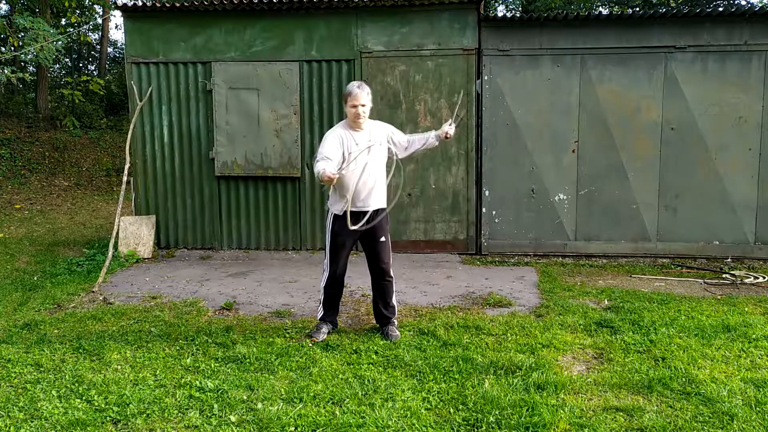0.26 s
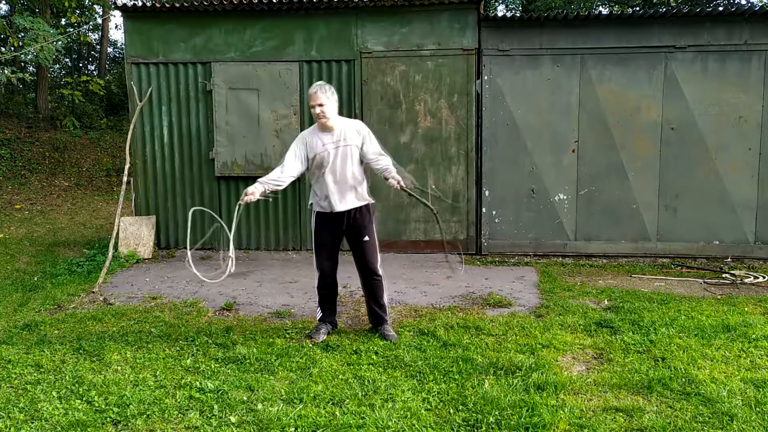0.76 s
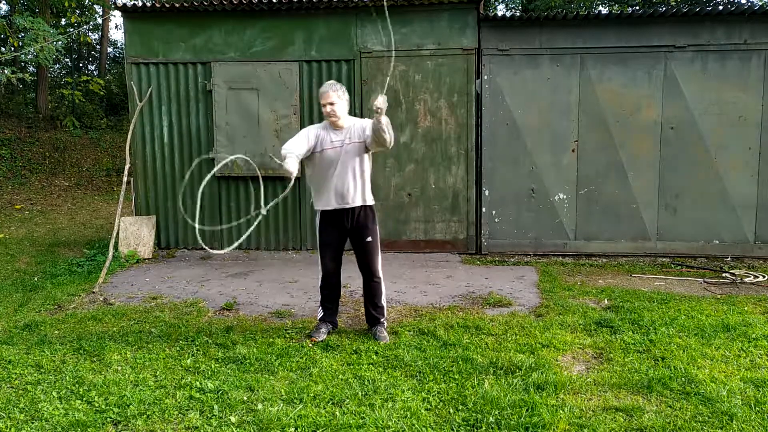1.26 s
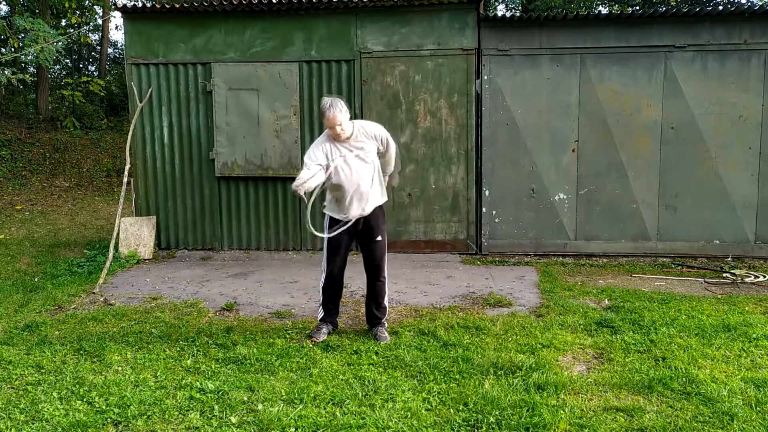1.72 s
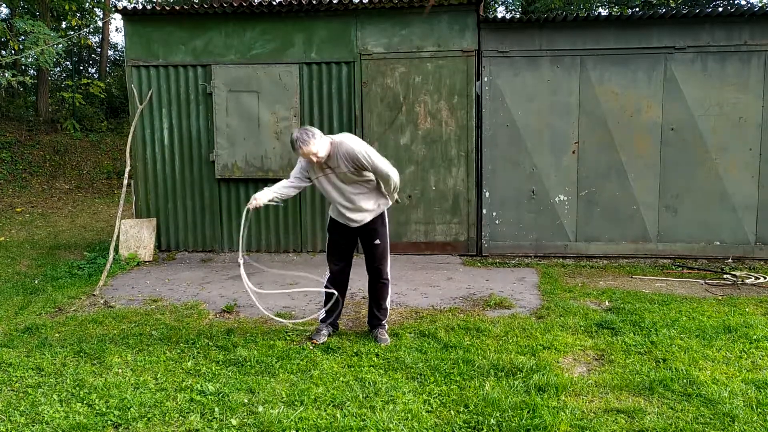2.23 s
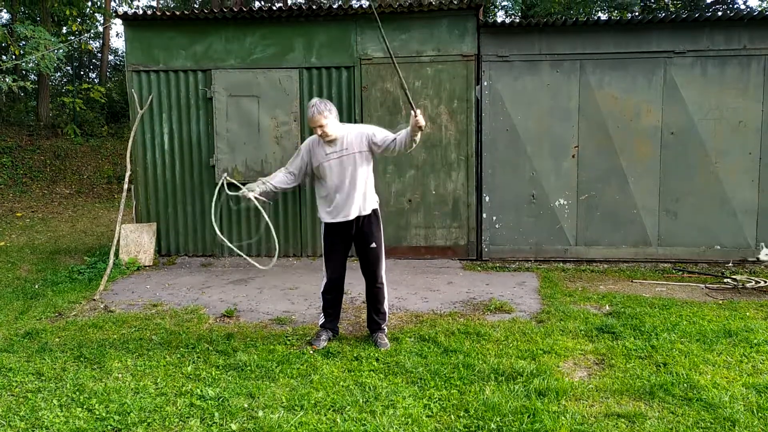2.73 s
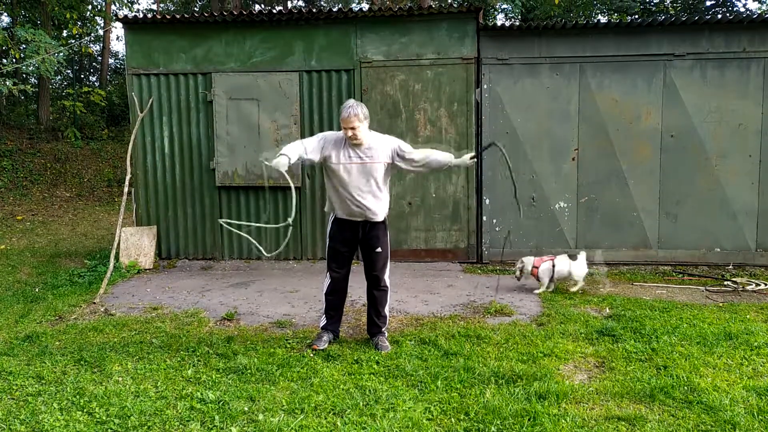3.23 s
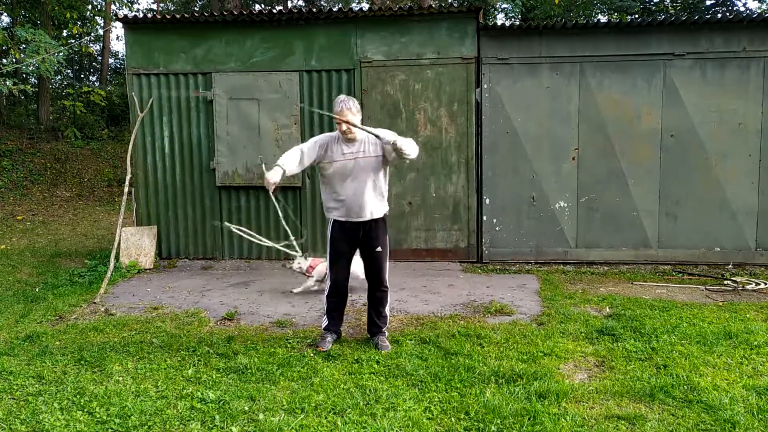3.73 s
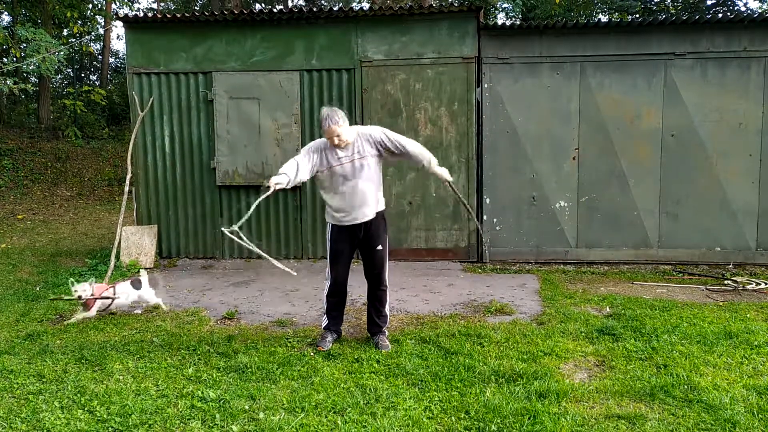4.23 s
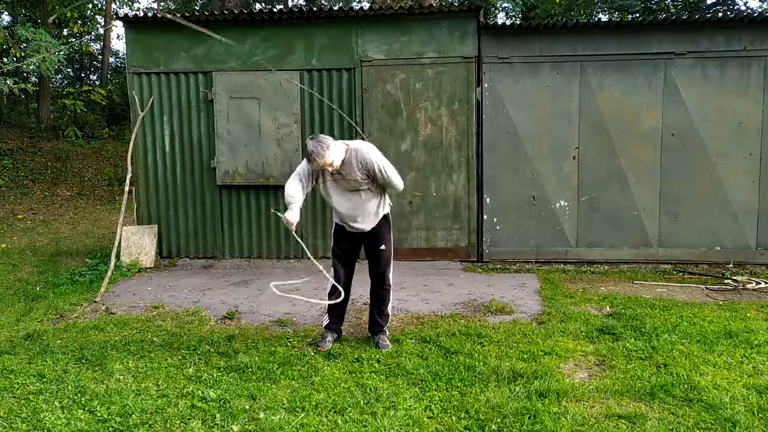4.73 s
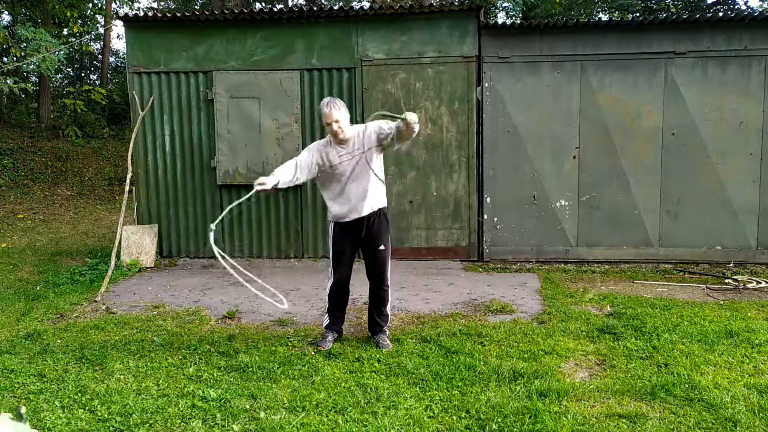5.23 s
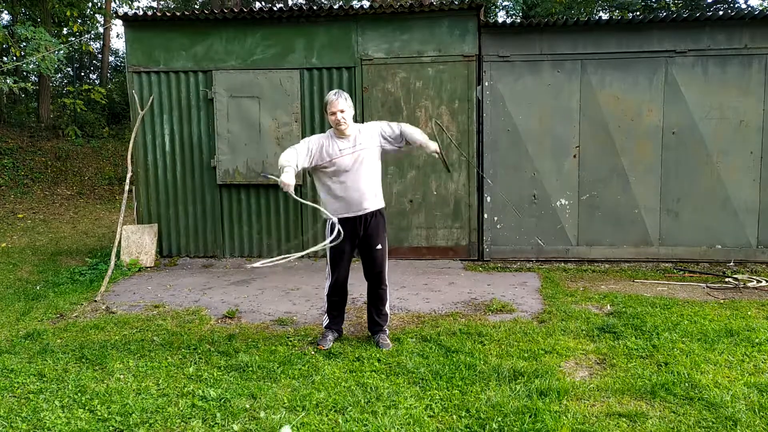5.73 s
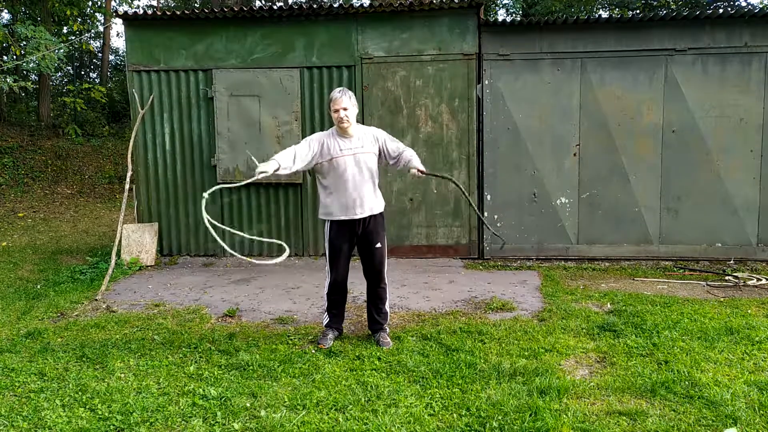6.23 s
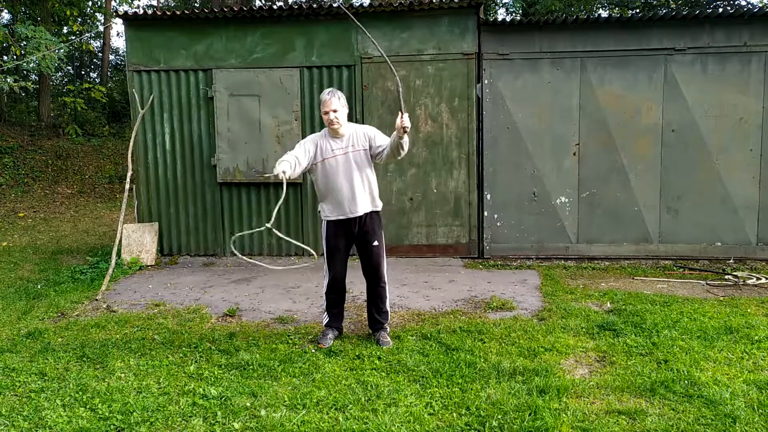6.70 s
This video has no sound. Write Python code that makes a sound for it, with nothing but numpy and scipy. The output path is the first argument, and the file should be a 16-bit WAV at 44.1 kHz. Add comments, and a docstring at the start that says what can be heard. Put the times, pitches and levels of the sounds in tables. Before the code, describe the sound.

A whip crack opens abruptly, then eight more follow at uneven gaps of roughly a third of a second to a second and a half. Each is a dry, explosive snap with a bright, quickly dying echo from a metal shed and a thinner tail from trees. Between them come breathy lash swishes, sleeve rustle, small ticks and soft rope thuds. Quiet outdoor air; the stereo microphone overloads slightly on the hardest cracks.

```python
"""A whip crack opens the scene and eight more follow, on a lawn in front of a sheet-metal shed.
Each is an N-shaped shock inside a noise burst; filtered, decaying noise gives the echoes of shed and trees.
The lash whistles in gliding bands of noise, and short noise blows are its patter and the rope's thuds.
Behind lie quiet air, rustling sleeves, a fizz near 10 kHz as of insects in the grass, and one faint far tone.
The hardest shocks choke the microphone: the level dips briefly and a low thump is added."""
import sys
import numpy as np
from scipy import signal
from scipy.fft import rfft, irfft
from scipy.io import wavfile
from scipy.ndimage import uniform_filter1d

SR = 44100
rng = np.random.default_rng(int(sys.argv[2]) if len(sys.argv) > 2 else 0)


def master_out(mix):
    """Clip the mix to full scale and print it as 16-bit PCM to the path in sys.argv[1]."""
    frames = np.transpose(np.atleast_2d(mix))
    ceiling = np.clip(frames, -1, 1)
    pcm = np.round(ceiling * 32767).astype(np.int16)
    wavfile.write(sys.argv[1], SR, pcm)


N = 306926

# the throws: t/s, left shock/dB, right shock/dB, burst length/s, early snap/dB, yard echo setting/dB,
#   far echo setting/dB, null of the shock's spectrum f/Hz, echo tilt at 12 kHz/dB, wind-up setting/dB,
#   wind-up length/s
CRACKS = [(0.0, 57, 57.5, 0.0011, -62, -11.5, -28, 6300, -3.5, -59, .05),
          (1.5426, 19, 46.5, 0.006954, -53, -10.5, -33, 7365, -0.5, -59, 0.06),
          (2.443, -9.5, 13.5, 0.005864, -14.5, -14, -30.5, 13000, 2, -42, 0.042),
          (3.171, 26, 23, 0.00266, -53, -14.5, -33, 8121, 0.5, -61.5, 0.07215),
          (3.4277, -13, 29, 0.004, -52.5, -17, -29.5, 10400, 1, -64, 0.062),
          (4.2812, 18.5, 43, 0.004803, -43, -11, -29.5, 6998, -1.5, -55.5, 0.1),
          (5.07, -10.5, 3, .0045, -3, -11.5, -28, 13300, 1, -48.5, .075),
          (5.8427, 26, 42, .0018, -60, -13, -31, 7865, 2.5, -60.5, 0.03977),
          (6.1409, -17, 29, 0.0048, -53, -19.5, -27, 12000, 6, -53, 0.034)]
# left-right likeness of sound straight from the whip: f/Hz, likeness/1
NEAR_SAME = [(300, 1), (2000, 0), (10000, 0)]
# left-right likeness of diffuse sound such as the echoes: f/Hz, likeness/1
ECHO_SAME = [(200, 0.96), (700, .4), (2000, 0), (8000, 0)]


def amp(db):
    """Level definition: the amplitude ratio of a level in dB."""
    return 10 ** (np.asarray(db) / 20)


def evened(x):
    """Normalization: scales a signal to rms 1."""
    return x / np.sqrt(np.mean(x ** 2) + 1e-20)


def read(points, hz):
    """Interpolation: joins a table's points by straight lines in log frequency."""
    f, value = np.transpose(points)
    return np.interp(np.log(hz + 1), np.log(f + 1), value)


def add(mix, s, sound):
    """Superposition: adds a stereo sound at time s; what falls outside the mix is dropped."""
    start = round(s * SR)
    sound = sound[:, max(-start, 0):]
    part = mix[:, max(start, 0):][:, :sound.shape[1]]
    part += sound[:, :part.shape[1]]


def noise(size, shape_db, same):
    """Partial coherence: stereo noise of rms 1, spectrum shape_db(hz), left-right likeness table same."""
    hz = np.fft.rfftfreq(size, 1 / SR)
    left, other = rfft(rng.standard_normal((2, size)))
    likeness = np.clip(read(same, hz), -1, 1)
    right = likeness * left + np.sqrt(1 - likeness ** 2) * other
    return evened(irfft(np.array([left, right]) * amp(shape_db(hz)), size))


def hump(centre_hz, octaves):
    """Band-pass response in dB: a rounded band with gentle skirts in log frequency."""
    def shape_db(hz):
        distance = np.log2((hz + 1) / centre_hz) / octaves
        return -40 * np.log10(1 + distance ** 2 / 2)
    return shape_db


def flutter(size, seconds):
    """Low-pass random modulation: chance of rms 1 that changes over about the given time."""
    hz = np.fft.rfftfreq(size, 1 / SR)
    lowpass = np.exp(-(hz * seconds) ** 2) * (hz > 0)
    return evened(irfft(rfft(rng.standard_normal(size)) * lowpass, size))


def swells(t, bouts, rest_db):
    """Amplitude summation: level in dB of bell-shaped swells (s, length s, dB) over a resting level."""
    bells = sum(amp(db) * np.exp(-((t - s) / length) ** 2) for s, length, db in bouts)
    return 20 * np.log10(amp(rest_db) + bells)


def background(rustle_db=-3):
    """Broadband ambience: quiet air, the rustle of sleeves and rope, and a high fizz from the grass."""
    # still outdoor air: f/Hz, density/dB; its left-right likeness: f/Hz, likeness/1
    air_shape = [(20, -35), (35, -12), (55, 0.14), (90, -2), (150, -8), (300, -8), (600, -14), (1500, -20),
                 (4000, -21), (16000, -24)]
    air_same = [(60, 0.83), (240, 0.9756), (950, 0.1783), (4000, 0)]
    # sleeves and rope swish twice with every throw: t after the crack/s, length/s, relative level/dB
    throw = [(-.01, .09, -59.5), (0.273, .13, -67)]
    # spectrum of the fizz: f/Hz, density/dB; its bouts: t at its height/s, length/s, level/dB
    fizz_shape = [(2000, -43), (6000, -16.5), (8300, -9), (9800, 1.5), (12000, -11), (16000, -10.5)]
    fizz_bouts = [(1.15, 0.71, -65), (3.125, 0.042, -50), (3.8, 0.74, -64.5), (6.5, 0.73, -57)]

    t = np.arange(N) / SR
    arms = [(row[0] + after, length, db) for row in CRACKS for after, length, db in throw]
    air = amp(-60) * noise(N, lambda hz: read(air_shape, hz), air_same)
    rustle_level = swells(t, arms, rest_db=-76) + rustle_db + 1.9 * flutter(N, 0.042)
    rustle = amp(rustle_level) * noise(N, hump(340, 0.24), NEAR_SAME)
    fizz_level = swells(t, fizz_bouts, rest_db=-78.5) + 1.8 * flutter(N, .02)
    fizz = amp(fizz_level) * noise(N, lambda hz: read(fizz_shape, hz), ECHO_SAME)
    return air + rustle + fizz


def far_tone():
    """Line spectrum: a faint tone of two sines with wandering phase sounds once, far off."""
    # lines of the tone: f/Hz, level/dB
    tone_lines = [(620, -70), (930, -68)]
    middle_s, length_s = 2.17, 0.2854
    t = np.arange(N) / SR
    lines = sum(amp(db) * np.sin(2 * np.pi * hz * t + 0.553 * flutter(N, 0.01532)) for hz, db in tone_lines)
    flat_topped_bell = np.exp(-(2 * (t - middle_s) / length_s) ** 4)
    return lines * flat_topped_bell


def tap(s, level_db, centre_hz, octaves, decay, scatter_db=-27, scatter_s=0.046):
    """Heavily damped impact: a dead blow without ring, and its faint scatter from the yard."""
    t = np.arange(SR // 5) / SR
    blow = (1 - np.exp(-8 * t / decay)) * np.exp(-t / decay)
    envelope = blow + amp(scatter_db) * np.exp(-t / scatter_s)
    return s, amp(level_db + 5) * envelope * noise(len(t), hump(centre_hz, octaves), NEAR_SAME)


def swish(s, length, level_db, pitch_hz, glide, thin_db, width_hz=210, thin_ratio=2.3, hiss_db=-2, flutter_db=2):
    """Vortex shedding: the thong's breathy tone follows its speed; the thin end sings higher and hisses."""
    t = np.arange(-length, length, 1 / SR)
    phase = 2j * np.pi * np.cumsum(pitch_hz * 2 ** (glide * t)) / SR  # glide in octaves per s

    def tone(ratio):
        """Heterodyning: low-passed complex noise is shifted up to the gliding pitch."""
        smooth = signal.butter(2, ratio ** 2 * width_hz / 2, fs=SR, output="sos")
        complex_noise = rng.standard_normal((len(t), 2)) @ [1, 1j]
        return evened((signal.sosfilt(smooth, complex_noise) * np.exp(ratio * phase)).real)

    hiss = noise(len(t), hump(2.4 * pitch_hz, 1.8), NEAR_SAME)
    envelope = amp(level_db + flutter_db * flutter(len(t), 0.031)) * np.exp(-(2 * t / length) ** 2)
    thin_end = .5 * tone(thin_ratio) + amp(hiss_db) * hiss
    return s - length, envelope * (tone(1) + amp(thin_db) * thin_end)


def sweep(s, length, level_db, pitch_hz, glide):
    """Speed-dependent radiation: the shorter a swing of the lash, the more of the thin end and its hiss."""
    flick_s, flick_thin_db, db_per_doubling = 0.044, 12.5, -14.5  # slow sweeps are duller
    return swish(s, length, level_db, pitch_hz, glide, flick_thin_db + db_per_doubling * np.log2(length / flick_s))


def bounce(ripple_db=1.0):
    """Multipath interference: many short paths off the ground ripple the spectrum (dB at Hz)."""
    grid = np.arange(0, SR / 2, 40)
    smooth = uniform_filter1d(rng.standard_normal(len(grid)), size=4)
    ripple = evened(uniform_filter1d(smooth, size=3))
    return lambda hz: ripple_db * np.interp(hz, grid, ripple)


def dying(x, t60, patchy_db):
    """Reverberant decay: each band dies at its own speed; scattered paths make it patchy."""
    hz, t, z = signal.stft(x, SR, nperseg=256)
    across_bands = uniform_filter1d(rng.standard_normal(z.shape[1:]), size=7, axis=0)
    patches = evened(uniform_filter1d(across_bands, size=4, axis=1))
    z = z * amp(patchy_db * patches - 60 * t / read(t60, hz)[:, None])
    return signal.istft(z, SR, nperseg=256)[1][:, :x.shape[1]]


def echoes(yard_db, far_db, body_db, top_db, null_hz, null_db, shed_s=.031, shed_width=0.0097, shed_db=3,
           hold=0.044575, slap_s=0.026, slap_db=4, trees_s=0.32, trees_db=3):
    """Diffuse reflection: lawn and ribbed shed wall scatter the crack at once, trees later and longer."""
    # spectra of the near and far echoes: f/Hz, density/dB
    yard_shape = [(25, -47.5), (100, -20.5), (250, -16.5), (600, -20), (1400, -17.5), (2100, -5),
                  (2800, -6.5), (3600, 0), (5000, 1.5), (7000, -0.5), (10000, -1.5), (12000, -6.5),
                  (16000, -10)]
    far_shape = [(25, -39), (100, -5.5), (400, -26.5), (1300, -14), (2300, -10), (4000, -1), (6000, -1.5),
                 (8000, -6.5), (11000, -2.5), (16000, -16)]
    # their ring times: f/Hz, t60/s
    yard_t60 = [(200, 0.17), (1000, 0.394), (2500, 0.36158), (5000, 0.3265), (10000, 0.31157),
                (16000, 0.21)]
    far_t60 = [(200, 1.4), (1000, 1.9822), (4000, 1.3002), (8000, 1.0107), (16000, 0.15)]

    t = np.arange(SR * 5 // 4) / SR
    tilt = [(700, 0.0035), (2000, body_db), (4500, 0.0071), (12000, top_db)]
    ripple = bounce(ripple_db=2.08)

    def colour(hz):
        """Destructive interference: the two edges of the N wave cancel at one frequency."""
        return read(tilt, hz) - null_db * np.exp(-((hz / null_hz - 1) / 0.2) ** 2)

    yard = noise(len(t), lambda hz: read(yard_shape, hz) + colour(hz) + ripple(hz), ECHO_SAME)
    yard = dying(yard, yard_t60, patchy_db=1.5)
    far = noise(len(t), lambda hz: read(far_shape, hz) + 0.15 * colour(hz), ECHO_SAME)
    far = dying(far, far_t60, patchy_db=2.0)
    # the wall answers with a short slap, its ribs with a swell
    slap = slap_db * np.exp(-((t - slap_s) / .001) ** 2)
    ribs = shed_db * np.exp(-((t - shed_s) / shed_width) ** 2)
    # paths keep arriving, so the level holds before it falls
    arriving = 9.0222 * np.minimum(t / hold, 1) - 0.5
    yard *= amp(yard_db + arriving + (slap + ribs))
    trees = trees_db * np.exp(-((t - trees_s) / 0.068) ** 2)
    far *= amp(far_db + trees) * (1 - np.exp(-t / 0.017))
    # single strong reflections stand out of the wash
    return (yard + far) * amp(1.5 * flutter(len(t), .001) + .8 * flutter(len(t), .012))


def burst(level_db, length, bass_db, lead=0.011, lead_db=-15, rise=0.0027, fall=0.0033):
    """Aerodynamic noise and scattering: the speeding tip tears the air; the ground scatters the shock."""
    # spectrum of the snap: f/Hz, density/dB
    snap_shape = [(20, -39.5), (80, 0), (160, -5), (260, -9.5), (400, -1), (550, -16.5), (900, -1),
                  (1400, -11.5), (3700, 1.5), (8000, 1), (12000, -6.5), (16000, -11)]
    t = np.arange(SR // 16) / SR - lead
    before = amp(lead_db) * np.exp(np.minimum(t, 0) / rise)
    after = np.exp(-np.maximum(t - length, 0) / fall)
    envelope = np.where(t < 0, before, after)
    shelf, ripple = [(900, bass_db), (2600, 0.014)], bounce()
    tear = noise(len(t), lambda hz: read(snap_shape, hz) + read(shelf, hz) + ripple(hz), NEAR_SAME)
    return lead, amp(level_db) * envelope * tear


def shock(left_db, right_db, size=12):
    """Sonic boom: the supersonic tip sends out an N-shaped wave about a quarter of a millisecond long."""
    return amp([[left_db], [right_db]]) * np.linspace(1, -1, size)


def crack(s, left_db, right_db, length, early_db, yard_db, far_db, null_hz, top_db, wind_up_db, wind_up_s):
    """Acceleration to supersonic speed: rising swish, early snap, burst, shock, echoes as (s, sound) parts."""
    hardness_db = right_db  # the right capsule mostly takes the shock more squarely
    bass_db = min(-11.5 + 0.63 * hardness_db, 9.5)  # a harder shock has more bass, up to a limit
    # a shorter wave has a higher null and less body at 2 kHz: -3 dB per octave
    body_db = 3 - 3 * np.log2(null_hz / 6512)
    # the harder the shock, the less of the crack is left in the burst
    lead, tear = burst(-2 - 0.0835 * hardness_db, length, bass_db)
    # the tip may snap once, 8 ms before the main crack
    early_s = .008
    _, early = burst(early_db, length=.0025, bass_db=-2)
    answer = echoes(yard_db, far_db, body_db, top_db, null_hz, null_db=5)
    # the wind-up peaks 0.31 of its length early, at 850 Hz, rising 1.15 octaves over that length
    wind_up = swish(s - 0.31 * wind_up_s, wind_up_s, wind_up_db, pitch_hz=850, glide=1.15 / wind_up_s, thin_db=1)
    return [wind_up, (s - lead - early_s, early), (s - lead, tear), (s, shock(left_db, right_db)), (s, answer)]


def scene():
    """Superposition: cracks, swings, ticks and thuds a little to the left, over air and one far tone."""
    # the lash swung round between cracks: t at its loudest/s, length/s, level setting/dB, pitch there f/Hz,
    #   glide/(octaves per s)
    swings = [(0.325, 0.059, -50, 848.8, 8.5), (0.601, 0.084, -54, 762.8, -5),
              (1.234, .12, -64.5, 796.1, -1), (1.826, 0.04427, -57.5, 1095, 8),
              (2.04, .07, -52.5, 932.5, -2), (2.679, 0.12, -54, 752, 0), (3.656, 0.043, -53.5, 723.5, 14),
              (4.027, 0.035, -67.5, 880, 0.5), (4.63, .12, -52, 800, 2), (4.887, 0.04, -68, 1204, 2),
              (5.318, .12, -53, 664, -1), (5.668, 0.053, -63, 903, 4.5), (5.758, 0.043, -58.5, 1001, -0.5)]
    # the lash pattering on the ground: t/s, level setting/dB, centre f/Hz, width/octaves, decay/s
    ticks = [(.7419, -27.5, 4083, 0.5253, 0.001331), (.756, -42.5, 4000, 2.638, .002),
             (0.8023, -42.5, 1500, 2.703, 0.01578), (0.8088, -28, 438.9, 1.692, 0.0015),
             (0.8192, -39, 880, 2.092, .0021), (.8321, -25, 7960, 1.636, 0.000644),
             (.839, -27.5, 5900, 1.4, 0.0003), (.847, -38.5, 7000, 1.466, 0.002682),
             (0.8991, -30, 1260, 1.653, 0.0016), (0.9154, -43.5, 800, 4.4, 0.0054),
             (3.702, -42.5, 800, 2.2, 0.0034), (5.811, -46, 7000, 1.5, .002)]
    # the coiled rope flapping against arm and leg: t/s, level setting/dB, decay/s
    thuds = [(0.271, -48, 0.00835), (.79, -55, 0.1176), (2.603, -37.5, 0.0034), (3.341, -48.5, 0.016),
             (3.667, -33.5, 0.003861), (4.51, -45.5, 0.00759), (5.222, -46, 0.0265), (6.28, -56, .04),
             (6.636, -52, .011)]

    whip = np.zeros((2, N))
    for row in CRACKS:
        for part in crack(*row):
            add(whip, *part)
    for row in swings:
        add(whip, *sweep(*row))
    for row in ticks:
        add(whip, *tap(*row))
    for s, level_db, decay in thuds:
        add(whip, *tap(s, level_db, centre_hz=216, octaves=0.84, decay=decay))
    return whip * amp([[.7], [-.7]]) + background() + far_tone()


def overload(x, choke_s=0.02267, choke=.15, full=70, leak_s=.014, swing_db=-3, cut_hz=49, left_lag=.0045,
             left_db=-2.0):
    """Bias shift: pressure past the limit deafens each capsule briefly, and it swings back with a thump."""
    over_db = np.maximum(20 * np.log10(abs(x) + 1e-9) - 12, 0)  # excess above a limit of 12 dB
    progress = np.minimum(np.arange(SR // 16) / SR / choke_s, 1)
    deaf = np.sin(np.pi * progress ** 0.81073) ** 2
    deaf_db = choke * signal.oaconvolve(over_db, deaf[None], axes=1)[:, :N]
    leaky_sum = signal.lfilter([1], [1, -np.exp(-1 / (leak_s * SR))], over_db)
    bias = np.tanh(leaky_sum / full)
    # the steep low-cut turns the step in bias into a few slow swings
    thump = signal.sosfilt(signal.butter(6, cut_hz, "high", fs=SR, output="sos"), bias)
    t = np.arange(N) / SR
    thump[0] = amp(left_db) * np.interp(t - left_lag, t, thump[0], left=0)  # the left capsule gives way later
    return x * amp(-deaf_db) + amp(swing_db) * thump


def record(dry):
    """Saturation and band limit: overloaded capsules, soft clipping, a 3 ms fade-in, then a low-pass."""
    fade_in = np.minimum(np.arange(N) / SR / .003, 1)
    clipped = .85 * np.tanh(overload(dry) / .85) * fade_in
    lowpass = signal.firwin(511, 16000, window=("kaiser", 9), fs=SR)
    return signal.oaconvolve(clipped, lowpass[None], "same")


dry = scene()
out = record(dry)
master_out(out)
```